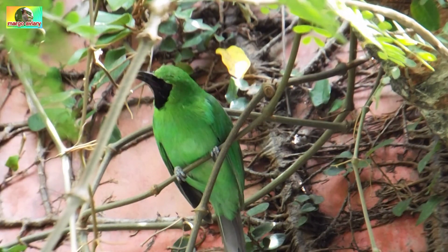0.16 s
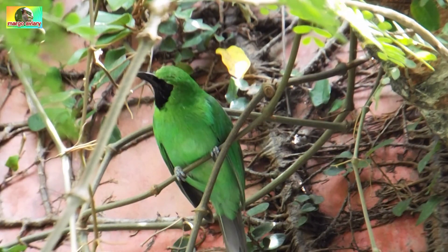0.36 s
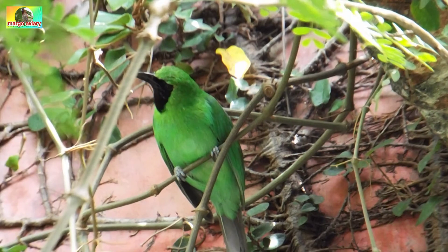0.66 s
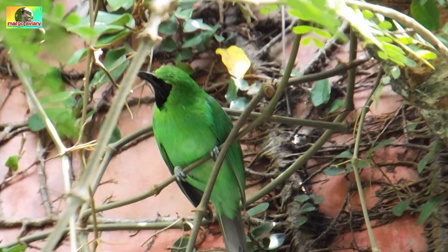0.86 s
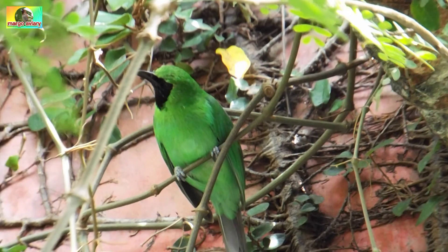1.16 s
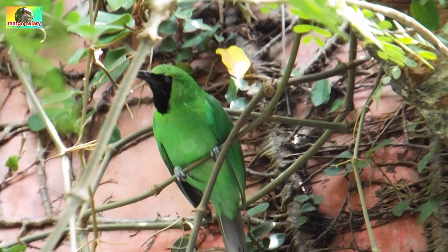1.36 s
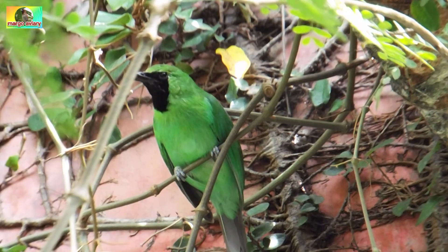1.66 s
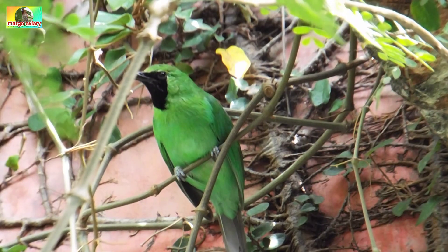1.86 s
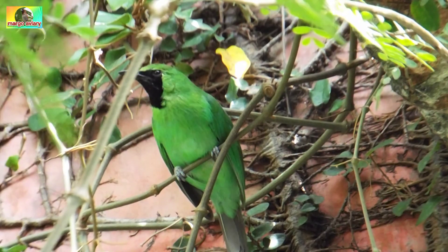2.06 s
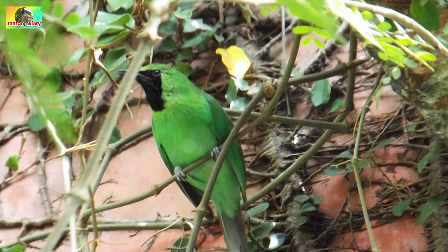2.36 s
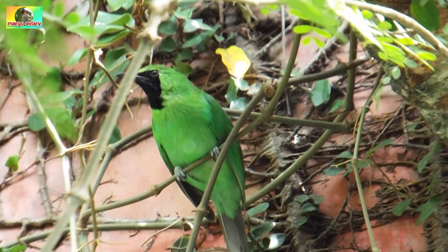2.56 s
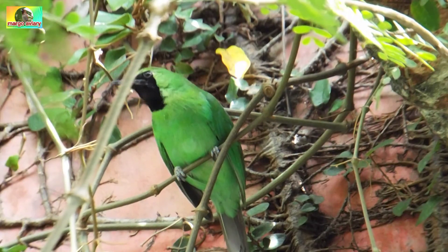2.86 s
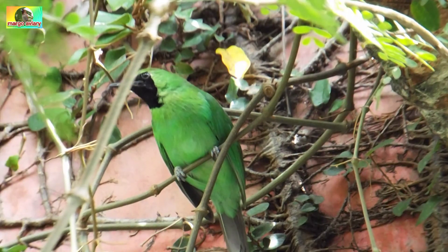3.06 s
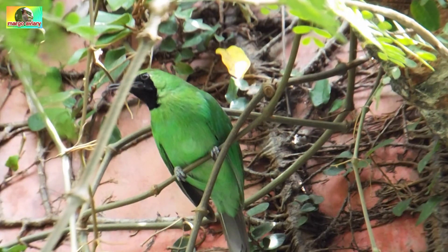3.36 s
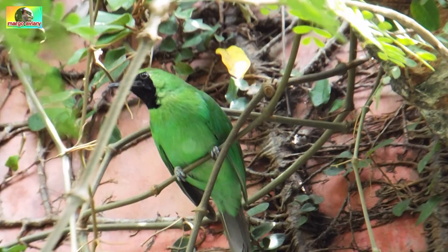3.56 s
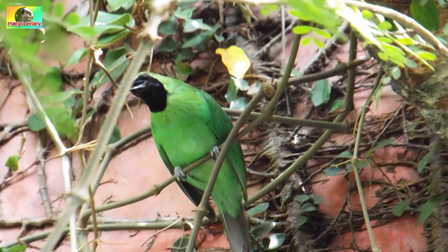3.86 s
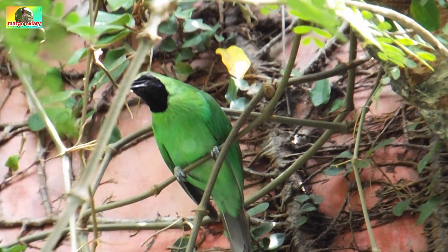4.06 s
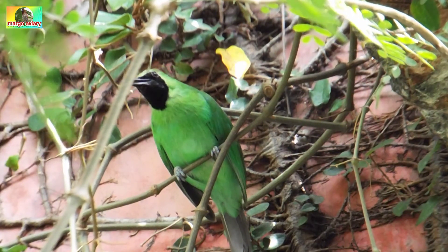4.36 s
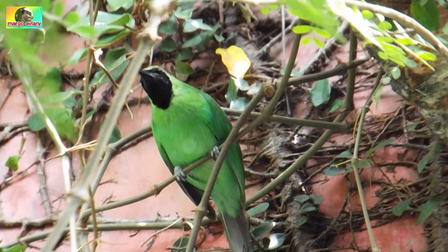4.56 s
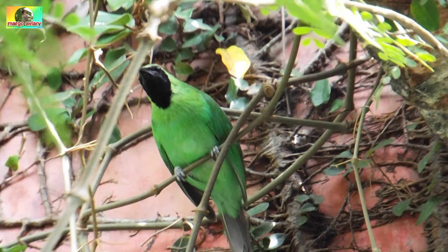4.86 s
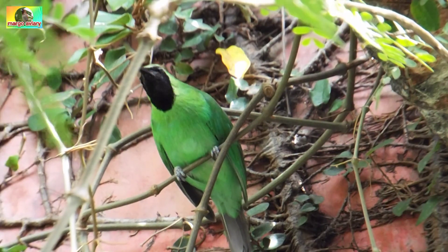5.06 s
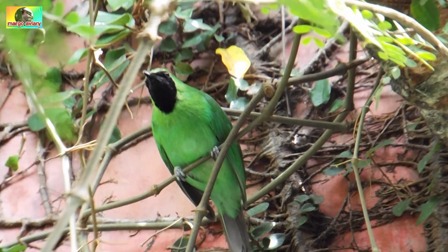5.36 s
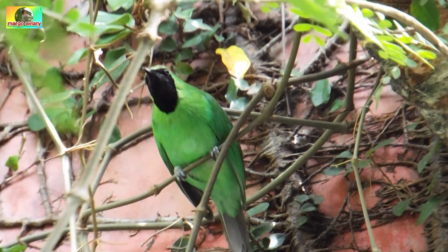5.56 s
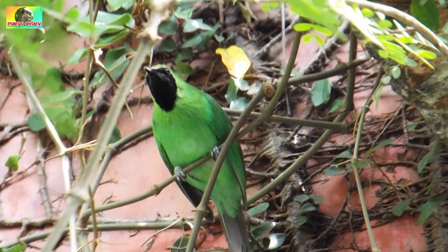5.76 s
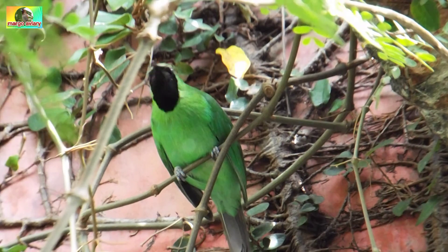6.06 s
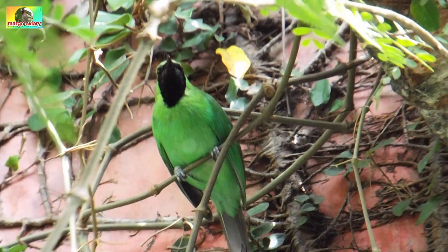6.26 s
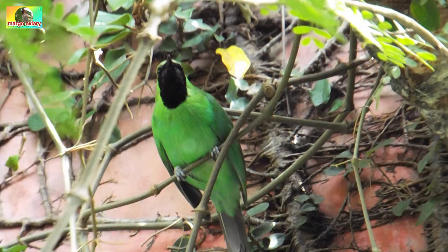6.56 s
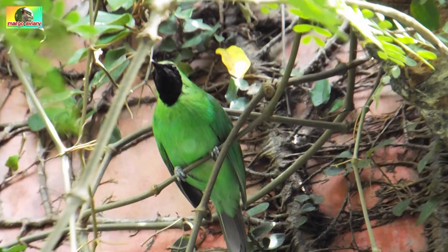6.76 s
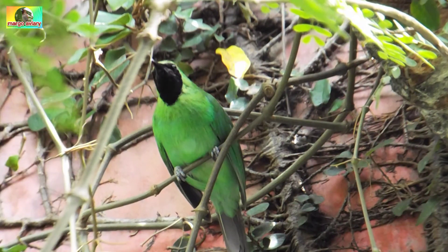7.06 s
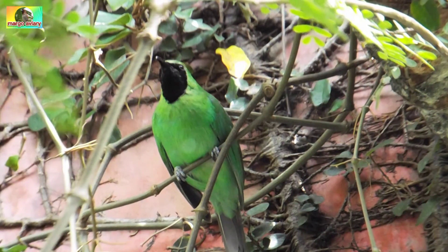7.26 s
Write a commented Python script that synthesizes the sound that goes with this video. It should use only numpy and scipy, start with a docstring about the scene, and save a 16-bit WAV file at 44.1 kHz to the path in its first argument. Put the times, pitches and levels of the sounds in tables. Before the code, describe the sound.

A single leafbird sings close by in an outdoor, hard-walled aviary. A harsh falling 'tchew' returns roughly every 0.7 seconds among quick chirps, dry rasps, sharp chips, thin high notes and hoarse upward swoops. After a short nasal mew, the song becomes softer, purer whistles. Every note rings briefly off the walls over a steady low rumble and rush that dips under loud phrases.

```python
"""In a hard-walled aviary outdoors, a leafbird sings on a branch: a harsh falling 'tchew' keeps returning among
chirps, rasps, sharp chips and hoarse swoops, then a nasal mew and a run of softer, purer whistles.
Pitched notes are sines shaken by roughness; rasps are leaping tones and noise through a throat and beak.
Decaying noise rings after every note as the enclosure, over a steady rush of filtered noise;
the camera's gain control leans on the loud phrases."""
import sys
import numpy as np
from scipy import signal
from scipy.fft import rfft, irfft, next_fast_len
from scipy.io import wavfile
from scipy.ndimage import uniform_filter1d, minimum_filter1d, map_coordinates

SR = 44100
rng = np.random.default_rng(int(sys.argv[2]) if len(sys.argv) > 2 else 0)


def file_out(sig):
    """Save sig as 16-bit WAV at sys.argv[1]."""
    # one column per channel
    cols = np.atleast_2d(sig).T
    # limit, then scale
    lim = np.clip(cols, -1, 1)
    pcm = np.round(lim * 32767).astype(np.int16)
    wavfile.write(sys.argv[1], SR, pcm)


N = 326340
LEAD = SR // 4  # samples of song and echo kept ahead of time zero
TOP_HZ = 15300  # band limit of the microphone track and of the bird's overtones


def amp(db):
    """Decibels to gain."""
    return 10 ** (np.asarray(db) / 20)


def unit(x):
    """Scale to rms 1."""
    return x / np.sqrt(np.mean(x ** 2) + 1e-20)


def along(points, hz):
    """Read (Hz, value) points on a log frequency axis."""
    f, v = np.transpose(points)
    return np.interp(np.log(hz + 1), np.log(f + 1), v)


def curves(rows):
    """One value per sample for each column, from the first row's time to the last."""
    s, *columns = np.transpose(rows)
    times = np.arange(s[0], s[-1], 1 / SR)
    return [np.interp(times, s, column) for column in columns]


def wobble(rate, size):
    """A smooth random curve through `rate` random knots a second."""
    knots = rng.standard_normal(size // 4 + 8)
    return map_coordinates(knots, [np.arange(size) * rate / SR], mode="mirror")


def filtered(x, response):
    """Multiply the spectrum of x by a response given as a function of Hz."""
    n = x.shape[-1]
    m = next_fast_len(n + 4096)
    return irfft(rfft(x, m) * response(np.fft.rfftfreq(m, 1 / SR)), m)[..., :n]


def stereo(pair, alike):
    """Blend two unrelated signals into left and right of a given likeness at each frequency."""
    def mid_side_gains(hz):
        turn = np.arccos(np.clip(along(alike, hz), -1, 1)) / 2
        return np.array([np.cos(turn), np.sin(turn)])

    mid, side = filtered(pair, mid_side_gains)
    return np.array([mid + side, mid - side])


def gate(size, edge):
    """Smooth opening and closing, each edge seconds long."""
    t = np.arange(size) / SR
    return np.sin(np.pi / 2 * np.clip(np.minimum(t, t[::-1]) / edge, 0, 1)) ** 2


def add(track, s, sound):
    """Mix in a sound at s seconds, on a track that starts LEAD samples before time zero."""
    part = track[max(0, round(s * SR) + LEAD):][:len(sound)]
    part += sound[:len(part)]


def background(patchy_db=3.5, drift_db=0.71):
    """Distant outdoor rumble and rush: filtered noise, gently uneven in time and colour."""
    # Each row: frequency in Hz, relative level of the rush in dB per Hz.
    rush_colour = [(15, -36), (25, 1.5), (181, -9.5), (344, -11), (438, -8.5), (978, -9.5), (1810, -14),
                   (2020, -14), (2430, -16), (2700, -17), (3260, -15), (3830, -16), (5720, -12),
                   (9520, -26), (15000, -31)]
    # Each row: frequency in Hz, left-right likeness from 0 to 1.
    rush_alike = [(60, 0.62), (150, 0.14), (380, 0.66), (940, 0.9), (2360, 0.86), (5900, 0.74),
                  (14800, 0.28)]
    # Each row: time in seconds, rms level in dB at the microphone before drift and gain control.
    rush_level = [(0, -30), (3, -28.5), (5.4, -28), (6.3, -28.5), (7, -26), (7.4, -28)]
    z = signal.stft(rng.standard_normal((2, N)), nperseg=2048)[2]
    # One patchiness for both sides, smoothed over frequency and then over time.
    patches = uniform_filter1d(rng.standard_normal(z.shape[1:]), size=4, axis=0)
    patches = uniform_filter1d(patches, size=8, axis=1)
    pair = signal.istft(z * amp(patchy_db * unit(patches)), nperseg=2048)[1][:, :N]
    rush = unit(filtered(stereo(pair, rush_alike), lambda hz: amp(along(rush_colour, hz))))
    level_db = np.interp(np.arange(N) / SR, *np.transpose(rush_level))
    return rush * amp(level_db + drift_db * wobble(4.91, N))


def harmonics(overtone_db):
    """Levels in dB of the fundamental and its overtones."""
    # One value each for harmonics 2 to 4: dB relative to the note's overtone level.
    overtone_steps = [0, -15.5, -33]
    return [0] + [overtone_db + step_db for step_db in overtone_steps]


def syrinx(pitch, rough, partials, flutter=0.0905, flutter_rate=750, shimmer_db=8, shimmer_rate=280, waver=0.0064):
    """A whistling membrane whose pitch wavers; roughness shakes its pitch and breaks its strength into pulses."""
    n, rough = len(pitch), np.clip(rough, 0, 1)
    # waver and flutter are shares of the pitch; the rates are random knots per second
    hz = pitch * (1 + waver * wobble(166.5, n) + flutter * rough * wobble(flutter_rate, n))
    phase = 2 * np.pi * np.cumsum(hz) / SR
    tone = sum(amp(db) * (k * pitch < TOP_HZ) * np.sin(k * phase) for k, db in enumerate(partials, 1))
    pulses = amp(shimmer_db * rough * np.tanh(wobble(shimmer_rate, n)))
    return unit(tone * pulses) * gate(n, edge=.007)


def rasp(length, centre_hz, width, slap_rate=170, slap_db=12, leap=.3, leap_rate=230, air_db=-5):
    """Chaotic membranes: a pitch that leaps about and uneven puffs of air, through the throat and beak."""
    # Each row: frequency in Hz, gain of the throat in dB.
    throat_gain = [(1000, -54), (1800, -2), (2400, 1), (3400, 2), (4300, -8), (5800, -4), (7000, -7),
                   (8400, -11), (10000, -6), (11500, -17), (13500, -14), (15500, -50)]
    n = int(length * SR)
    leaps = wobble(leap_rate, n)
    pitch = centre_hz * 2 ** (leap * width * (leaps - leaps.mean()))
    squeal = np.sin(2 * np.pi * np.cumsum(pitch) / SR)

    def throat_and_beak(hz):
        beak = 1 / (1 + (np.log2((hz + 1) / centre_hz) / width) ** 2)
        return amp(along(throat_gain, hz)) * beak

    air = unit(filtered(rng.standard_normal(n), throat_and_beak))
    voice = unit(filtered(squeal, throat_and_beak)) + amp(air_db) * air
    slaps = amp(slap_db * np.tanh(wobble(slap_rate, n)))
    return unit(voice * slaps) * gate(n, edge=min(.026, length / 2.5))


def build_up(burst, depth_db):
    """A burst that starts depth_db down and grows to full strength over the first 39 % of its length."""
    rising = np.clip(1 - np.linspace(0, 1, len(burst)) / 0.39, 0, 1)
    return amp(-depth_db * rising) * burst


def tchews(brighter_db_per_octave=3, attack_after_s=0.0018):
    """A harsh attack, a held tone that clears, a step down, then slackening tension in a long hoarse fall."""
    # Each row: start in seconds, level in dB, pitch factor, overtone level in dB, harsh attack level in dB,
    # level change over the whole syllable in dB, roughness factor.
    tchew_rows = [(-.085, 4.5, 1.01, -11.5, -7, -46, 1.43), (.588, -1, 1.016, -13.5, -6.5, -15, 0.66),
                  (1.234, 0.5, 0.97, -8.5, -5.5, -13, 1.15), (1.992, -2.5, .99, -9.5, -4, -11.5, 1.12),
                  (2.662, -3, 1.0, -10, -5, -7, 1.23), (3.463, -5.5, .995, -7, -6, -5.5, 1.12),
                  (4.163, -2.5, 1.003, -9.5, -6.5, -9.5, 1.13)]
    syllable_s, hold_s, step_s, fall_s = 0.36, .092, .024, .088  # fall_s: time constant of the fall
    # held tone, step, start and limit of the fall, before each row's pitch factor
    hold_hz, step_hz, break_hz, slack_hz = 3420, 2840, 2403, 1154
    rise_s, rise_db = 0.04, 13  # the tone swells in from this far down
    release_s, release_db, fade_db_per_octave = 0.022, 5.5, 16
    # roughness before each row's factor: harsh at first, clear in the hold, hoarse in the fall
    onset_rough, clears_s, hold_rough, fall_rough = 0.69, .024, .2, 0.694

    track = np.zeros(LEAD + N)
    t = np.arange(int(syllable_s * SR)) / SR
    before_fall = t < hold_s + step_s
    tension = np.exp(-np.maximum(t - hold_s - step_s, 0) / fall_s)
    falling_hz = slack_hz + (break_hz - slack_hz) * tension
    pitch = np.select([t < hold_s, before_fall], [hold_hz, step_hz], falling_hz)
    fallen_octaves = np.log2(hold_hz / pitch)
    swell_in_db = rise_db * np.clip(1 - t / rise_s, 0, 1)
    let_go_db = release_db * np.clip(1 - (syllable_s - t) / release_s, 0, 1)
    level = -fade_db_per_octave * fallen_octaves - swell_in_db - let_go_db
    rough = np.where(before_fall, hold_rough + onset_rough * np.exp(-t / clears_s), fall_rough)
    for s, db, factor, overtone_db, attack_db, tail_db, hoarse in tchew_rows:
        partials = harmonics(overtone_db + brighter_db_per_octave * fallen_octaves)
        tone = syrinx(factor * pitch, hoarse * rough, partials)
        add(track, s, amp(db + level + tail_db * t / syllable_s) * tone)
        harsh = rasp(length=0.075, centre_hz=4997, width=1.4, slap_rate=265, leap_rate=300)
        add(track, s + attack_after_s, amp(attack_db) * build_up(harsh, depth_db=9))
    return track


def rasps():
    """Rasps and chips: harsh bursts of chaotic membrane sound that build up and stop."""
    # Each row: start in seconds, length in seconds, centre in Hz, width in octaves from the centre to half
    # the beak's gain, level in dB, grain rate in random knots per second.
    rasp_rows = [ (-.02, 0.046, 3900, .98, -8, 250), (0.061, 0.15, 4000, 0.884, -17, 450),
                 (0.249, .195, 4675, 1.4, -7.5, 300), (0.951, 0.05, 5890, 0.82, -22.5, 440),
                 (1.025, 0.0092, 5360, 0.47, -8, 760), (1.035, 0.044, 4600, .21, -19.5, 420),
                 (1.628, 0.15, 5340, 1.3, -15, 340), (1.742, .034, 5630, 2.16, -3, 260),
                 (1.802, 0.053, 4700, 1.2, -3, 340), (2.467, 0.013, 5275, 0.5, -5, 900),
                 (3.09, .235, 5000, 1.39, -12.5, 400), (3.791, .335, 4430, 0.79, -11.5, 800),
                 (4.472, .04, 4500, .67, -11.5, 570), (4.823, 0.049, 4680, 0.38, -23, 420),
                 (5.19, 0.071, 4570, 0.18, -23, 500), (6.547, 0.069, 4600, 0.38, -21, 500)]
    track = np.zeros(LEAD + N)
    for s, length, centre_hz, width, db, grain_rate in rasp_rows:
        burst = rasp(length, centre_hz, width, slap_rate=grain_rate, leap_rate=grain_rate)
        add(track, s, amp(db) * build_up(burst, depth_db=6.5))
    return track


def slide(length, start_hz, end_hz):
    """Progress 0-1 and a pitch that moves fast at first, then settles on its end."""
    u = np.linspace(0, 1, int(length * SR))
    return u, end_hz + (start_hz - end_hz) * (1 - u) ** 1.9


def whistles():
    """Chirps and whistles: short slides of the membrane, louder and purer where the pitch is higher."""
    # Each row: start in seconds, length in seconds, start pitch in Hz, end pitch in Hz,
    # level at the mean pitch in dB, roughness (limited to 0-1).
    whistle_rows = [ (0.13, 0.046, 3860, 4220, -7.5, 0.3), (.24, 0.044, 5010, 5240, -9.5, 0.33),
                    (0.295, .06, 3590, 2880, -13.5, 0.7), (0.415, .048, 4204, 3200, -6, 0.37),
                    (0.586, 0.049, 2680, 3130, -12.5, 0.2), (0.973, 0.0263, 2825, 3185, -15.5, 0.17),
                    (0.995, 0.051, 3250, 2960, -9, 0.14), (1.057, 0.046, 2860, 2200, -22.5, 1.06),
                    (1.412, 0.051, 2550, 2600, -15.5, 0.3), (1.961, 0.047, 2493, 2480, -19, 0.23),
                    (2.183, .04, 2410, 2430, -19, 0), (2.32, 0.036, 4750, 4830, -27.5, 0.3),
                    (2.366, 0.038, 2324, 2520, -15, 0.36), (2.413, 0.042, 2358, 2490, -15.5, 0.42),
                    (2.596, 0.063, 2068, 2178, -16, 0.42), (4.642, 0.076, 1780, 1780, -22.5, 0.7),
                    (4.7, 0.027, 1756, 1815, -14, 0.3), (4.834, 0.037, 2534, 2736, -22, .1),
                    (4.934, 0.037, 3274, 3620, -13, 0.33), (5.03, 0.044, 1624, 1813, -19, 0.34),
                    (5.069, 0.0375, 1833, 1848, -15.5, 0.01), (5.064, 0.034, 3205, 3697, -11.5, .1),
                    (5.129, 0.097, 3070, 2583, -18.5, 0.16), (5.339, .055, 2710, 2560, -19.5, 0.26),
                    (5.381, 0.078, 2683, 3277, -14, 0.02), (5.494, .05, 1878, 1425, -21.5, 0.97),
                    (5.556, 0.053, 3280, 4210, -9.5, 0.24), (5.675, .125, 3185, 2830, -17, 0.05),
                    (5.873, 0.032, 2580, 2942, -12.5, 0.29), (5.901, .05, 2974, 3754, -9, 0.14),
                    (6.055, 0.075, 1492, 1400, -27, 0.53), (6.548, 0.04, 2360, 2090, -18, 0.37),
                    (6.59, 0.064, 2553, 2843, -14.5, 0.08), (6.979, 0.041, 4520, 4800, -21.5, 0.42),
                    (7.135, 0.089, 1714, 2026, -31, 0.26), (7.3, 0.03, 2150, 2515, -14.5, 0.25),
                    (7.329, 0.031, 2880, 3090, -16, 0), (7.346, 0.065, 2456, 2306, -16, 0.5)]
    effort_db_per_octave, purer_db_per_octave = 15, 8.5
    track = np.zeros(LEAD + N)
    for s, length, start_hz, end_hz, db, rough in whistle_rows:
        _, pitch = slide(length, start_hz, end_hz)
        level = db + effort_db_per_octave * np.log2(pitch / pitch.mean())
        overtone_db = -25 - purer_db_per_octave * np.log2(pitch / 2600)  # -25 dB at 2600 Hz
        add(track, s, amp(level) * syrinx(pitch, rough, harmonics(overtone_db)))
    return track


def tsips():
    """Thin high notes, nearly pure, that swell as they drop onto their pitch."""
    # Each row: start in seconds, landing pitch in Hz, final level in dB.
    tsip_rows = [(.283, 5720, -18), (0.336, 5700, -7), (.41, 5830, -12), (1.686, 5640, -19),
                 (1.821, 5600, -18), (2.458, 4770, -29), (3.151, 5480, -24), (3.207, 5750, -10.5),
                 (3.278, 5750, -11.5), (3.683, 5680, -22)]
    length_s, drop_ratio, swell_db = 0.082, 1.17, 7
    track = np.zeros(LEAD + N)
    for s, hz, db in tsip_rows:
        u, pitch = slide(length_s, drop_ratio * hz, hz)
        tone = syrinx(pitch, rough=0.086, partials=harmonics(overtone_db=-25))
        add(track, s, amp(db + swell_db * (u - 1.0)) * tone)
    return track


def swoops():
    """Two long hoarse swoops, mostly rising, as the membrane glides through pitch, strength and roughness."""
    # One list of rows per swoop. Each row: time in seconds, pitch in Hz, level in dB,
    # roughness (limited to 0-1), overtone level in dB.
    swoop_rows = [
        [(1.62, 2398, -14, 0.36, -23), (1.685, 2583, -18.5, 0.53, -22), (1.74, 3223, -14, 0.72, -6),
         (1.785, 3413, -2.5, 0.54, -14), (1.81, 3584, -20, 0.54, -12), (1.84, 3313, -1, 0.1, -12),
         (1.872, 3255, -10, 0.21, -24)],
        [(3.088, 2800, -18, 0.16, -6), (3.125, 2861, -19, 1.1, -5.5), (3.245, 3312, -11.5, .97, -10),
         (3.262, 3013, -12, .96, -4), (3.315, 3320, -5.5, 0.84, -15), (3.336, 4340, 1.5, 0.66, -22),
         (3.35, 5190, 7, .4, -35), (3.37, 5900, -25, 0.1, -28)],
    ]
    track = np.zeros(LEAD + N)
    for swoop in swoop_rows:
        pitch, level, rough, overtone_db = curves(swoop)
        add(track, swoop[0][0], amp(level) * syrinx(pitch, rough, harmonics(overtone_db)))
    return track


def nasal_mew():
    """One falling mew, made nasal by a strong third harmonic and a weakened fundamental."""
    # Each row: time in seconds, pitch in Hz, level in dB.
    mew_rows = [(4.372, 2330, -18), (4.411, 2278, -14.5), (4.451, 2226, -11.5), (4.481, 2182, -14),
                (4.505, 2080, -24)]
    # One value per harmonic, from the fundamental up: level in dB.
    mew_partials = [-13, 0, -3, -14.5, -26, -24]
    track = np.zeros(LEAD + N)
    pitch, level = curves(mew_rows)
    add(track, mew_rows[0][0], amp(level) * syrinx(pitch, rough=0.342, partials=mew_partials))
    return track


def song():
    """All the bird's syllables, as they leave its beak."""
    return tchews() + rasps() + whistles() + tsips() + swoops() + nasal_mew()


def aviary(x, direct_db=-5, echo_db=-1, early_db=3, early_s=0.0089, first_s=0.0039):
    """Direct sound, strong answers from the near walls, then a noise tail decaying at its own rate per band."""
    # Each row: frequency in Hz, time to ring down by 60 dB in seconds.
    ring_time = [(1000, 0.52), (3000, 0.55), (6000, 0.41), (10000, 0.45), (15000, 0.57)]
    # Each row: frequency in Hz, left-right likeness of the echo from 0 to 1.
    echo_alike = [(1500, 0.97), (3000, 0.96), (5000, 0.83), (9000, 0.56), (13000, 0.31)]
    hz, t, z = signal.stft(rng.standard_normal((2, SR)), SR, nperseg=256)
    decay = amp(-60 * t / along(ring_time, hz)[:, None])
    tail = signal.istft(z * decay, SR, nperseg=256)[1]
    t = np.arange(tail.shape[1]) / SR
    near_walls = amp(early_db * np.exp(-t / early_s))
    arrival = 1 - np.exp(-(t / first_s) ** 2)
    tail = stereo(tail * near_walls * arrival, echo_alike)
    echo = signal.fftconvolve(x[None], tail / np.linalg.norm(tail[0]), axes=1)[:, :len(x)]
    return (amp(direct_db) * x + amp(echo_db) * echo)[:, LEAD:]


def scene():
    """Bird and background at the microphones, mostly a little stronger on the left."""
    # Each row: frequency in Hz, left minus right in dB.
    left_lean = [(60, 4.5), (110, -5), (200, -1.5), (380, 0.5), (690, 2.0), (1280, 2), (2360, 2.5),
                 (4340, 6), (8010, 3.5), (14800, -1)]
    halves = np.array([[.5], [-.5]])
    return filtered(aviary(song()) + background(), lambda hz: amp(along(left_lean, hz) * halves))


def gain_control(x, threshold_db=-13, share=0.77, attack_s=0.036, release_db_per_s=65,
                 treble_db_per_octave=3, pivot_hz=3300):
    """The camera turns down on loud, bright sound and recovers at a limited rate, so the background sinks and returns."""
    t = np.arange(N) / SR
    sensed = filtered(x.mean(axis=0), lambda hz: amp(treble_db_per_octave * np.log2((hz + 1) / pivot_hz)))
    keep = np.exp(-1 / (attack_s * SR))
    power = signal.lfilter([1 - keep], [1, -keep], sensed ** 2)
    # share: dB turned down per dB over the threshold
    over_db = share * np.maximum(10 * np.log10(power + 1e-12) - threshold_db, 0)
    recovery_db = release_db_per_s * t
    # The running maximum keeps the gain from recovering faster than the release rate.
    return x * amp(recovery_db - np.maximum.accumulate(over_db + recovery_db))


def record(dry, hold=0.0062):
    """Gain control, a limiter that holds peaks (hold in seconds) to full scale, then the band limit."""
    levelled = gain_control(dry)
    needed = np.minimum(1, 1 / (np.abs(levelled).max(axis=0) + 1e-9))
    held = minimum_filter1d(needed, size=int(hold * SR) + 1)
    gain = uniform_filter1d(held, size=int(hold * SR / 2) + 1)
    return filtered(levelled * gain, lambda hz: hz < TOP_HZ)


dry = scene()
out = record(dry)
file_out(out)
```